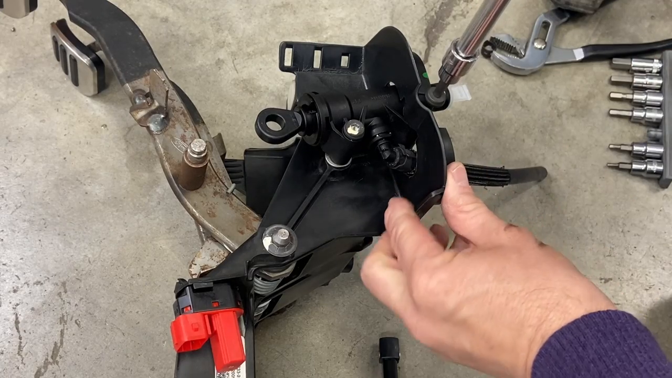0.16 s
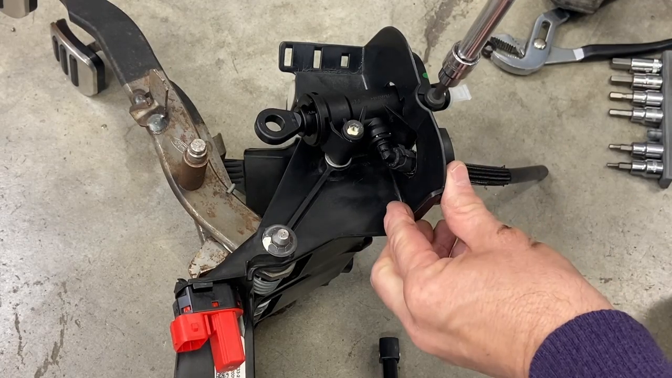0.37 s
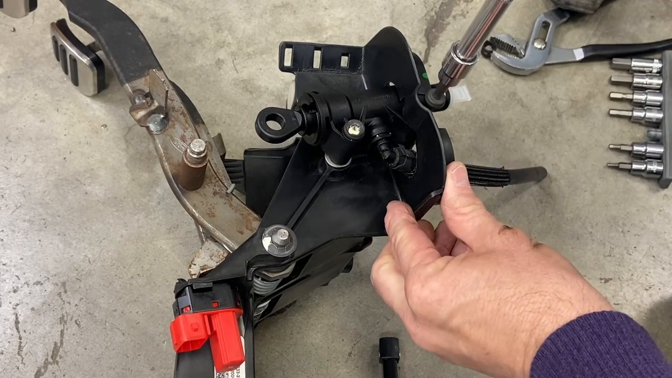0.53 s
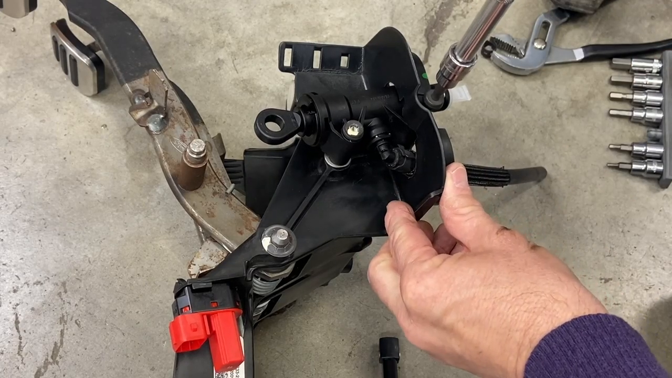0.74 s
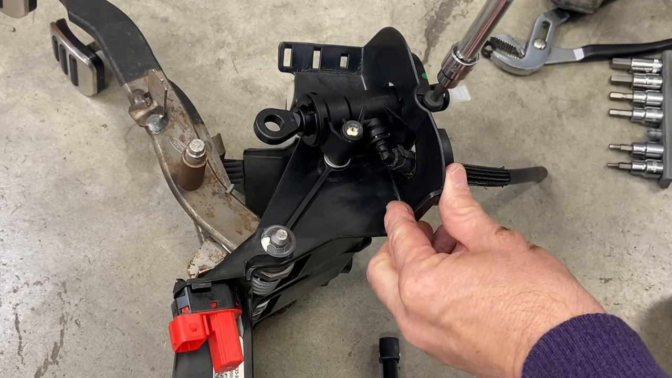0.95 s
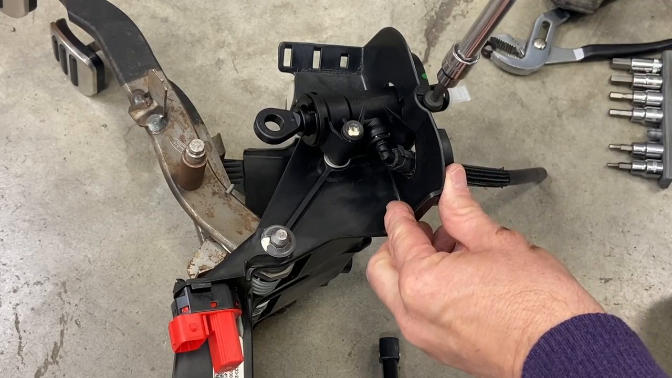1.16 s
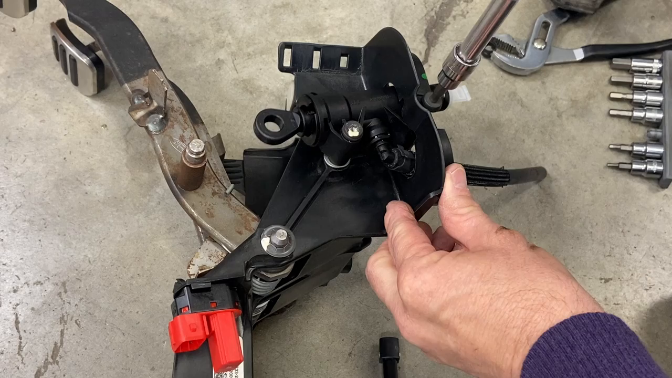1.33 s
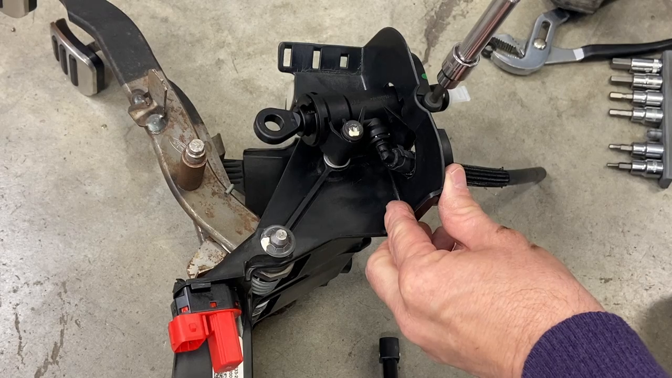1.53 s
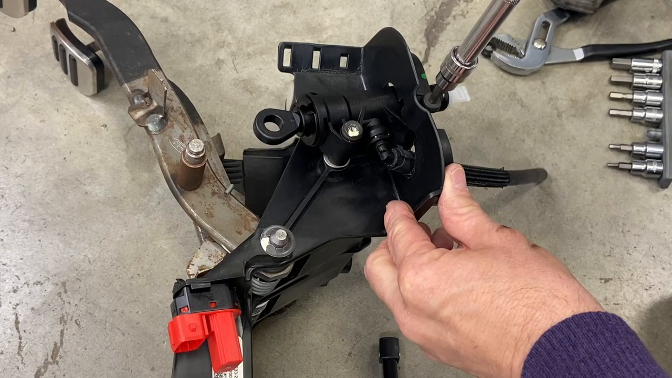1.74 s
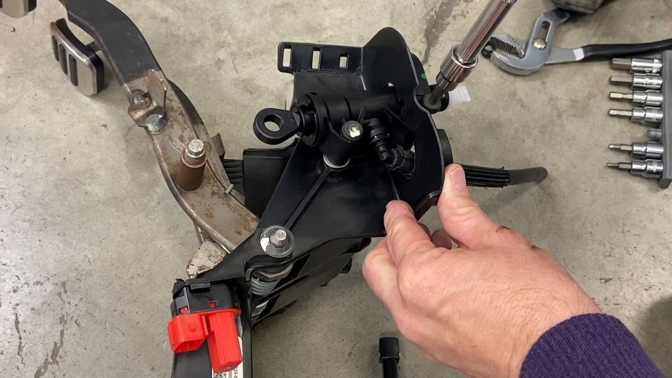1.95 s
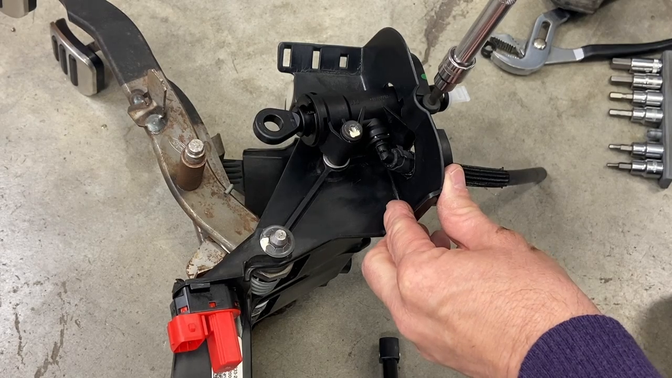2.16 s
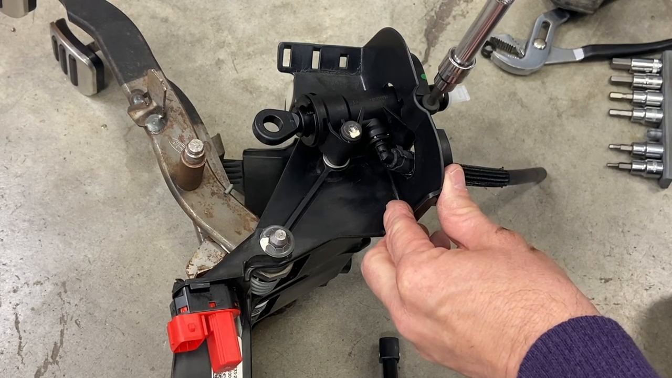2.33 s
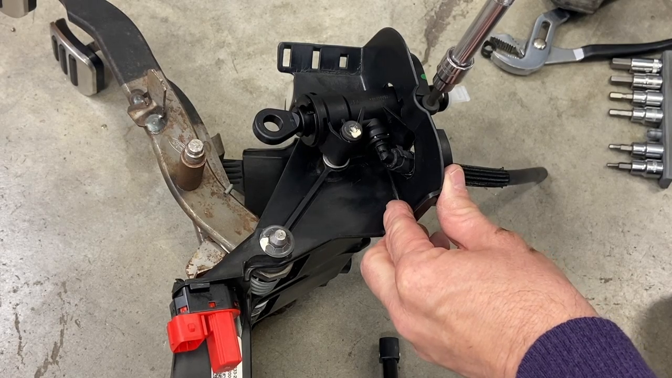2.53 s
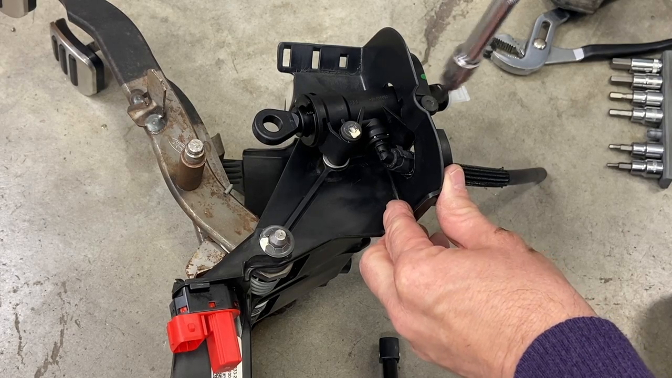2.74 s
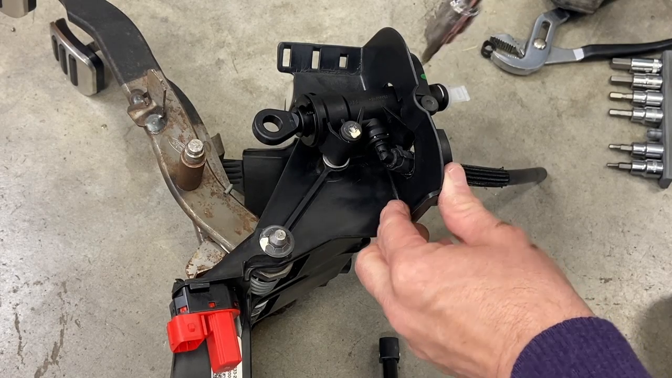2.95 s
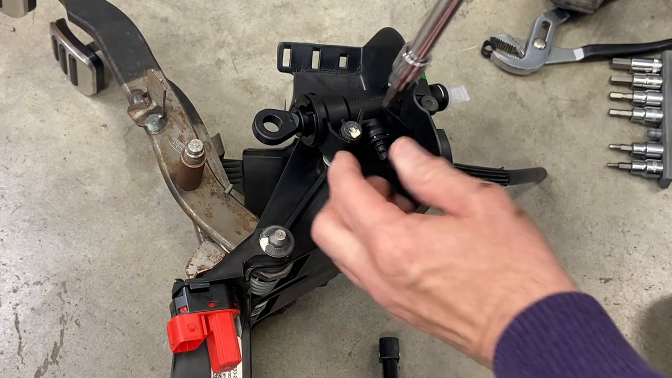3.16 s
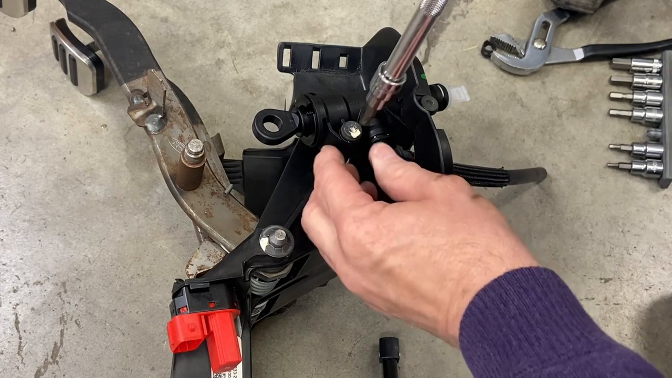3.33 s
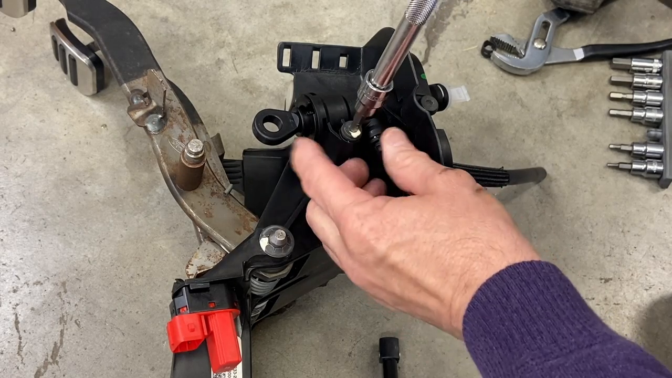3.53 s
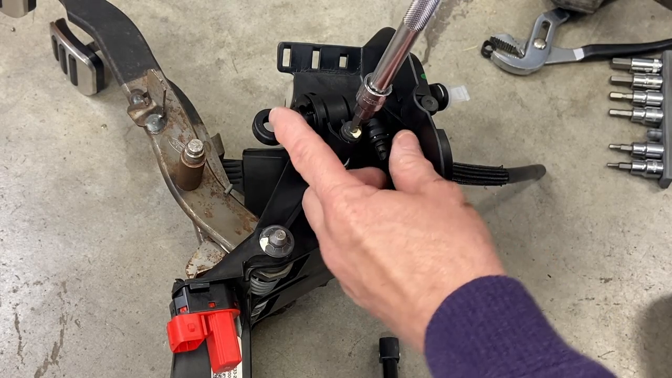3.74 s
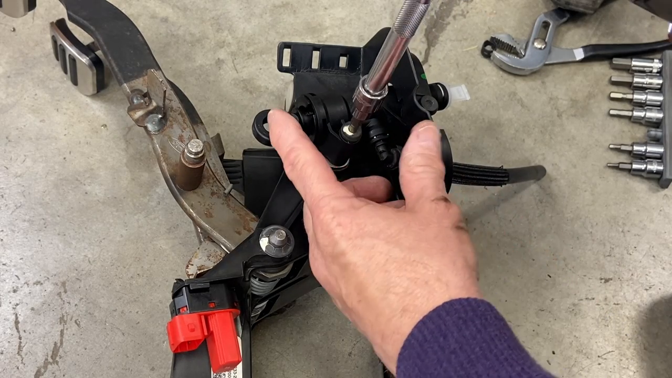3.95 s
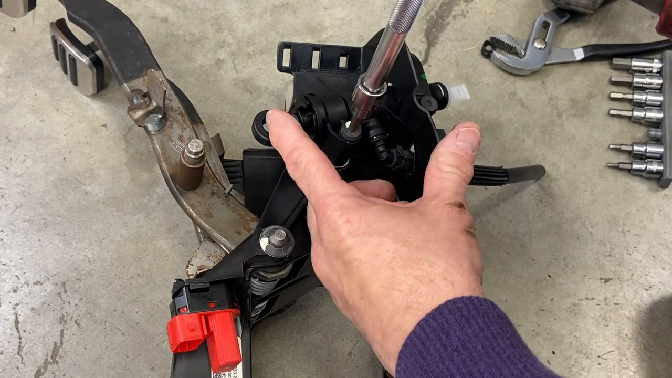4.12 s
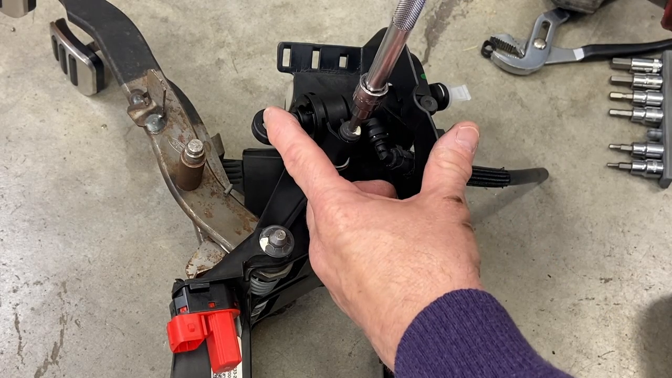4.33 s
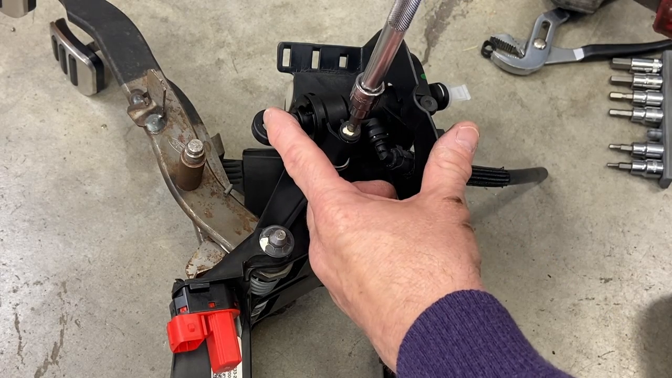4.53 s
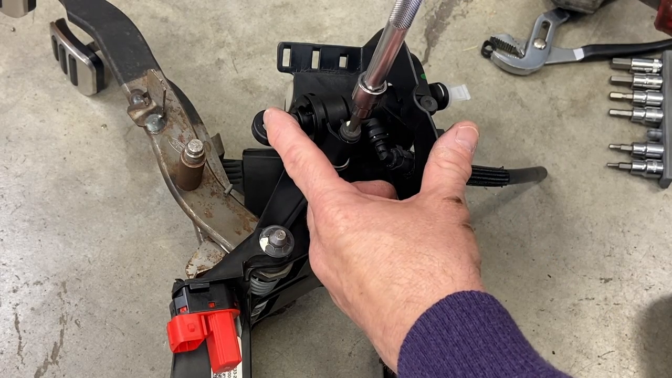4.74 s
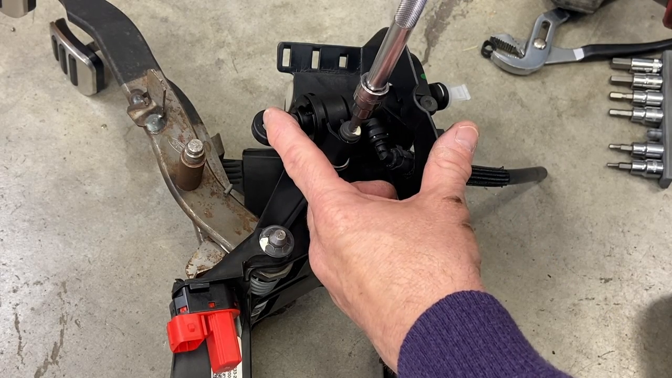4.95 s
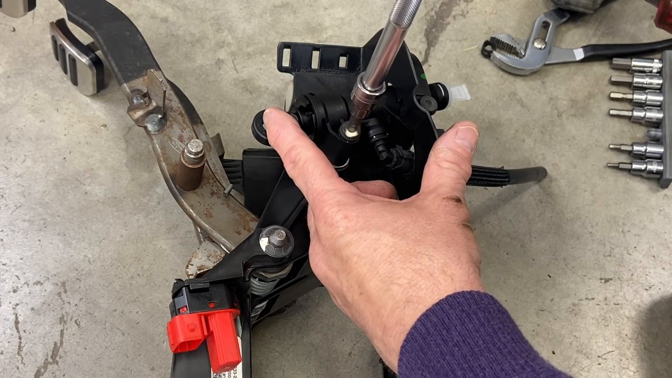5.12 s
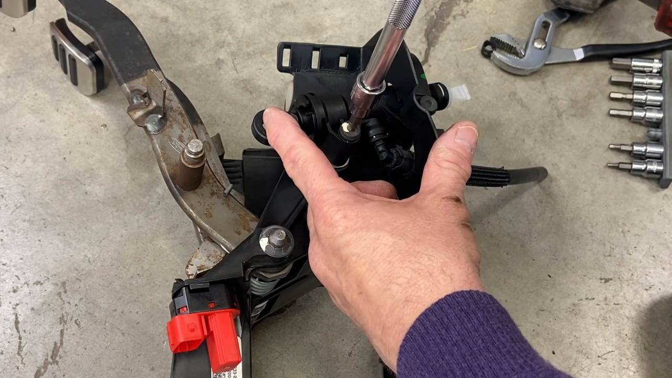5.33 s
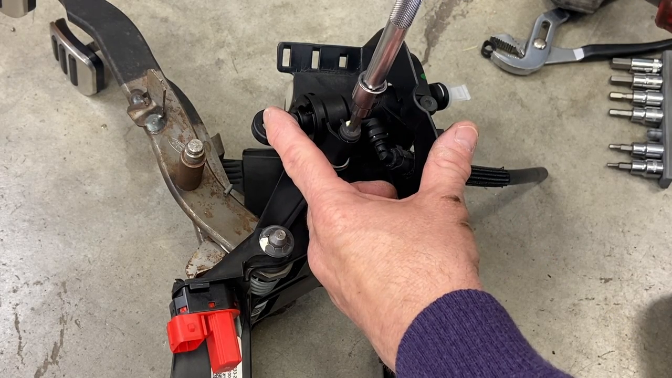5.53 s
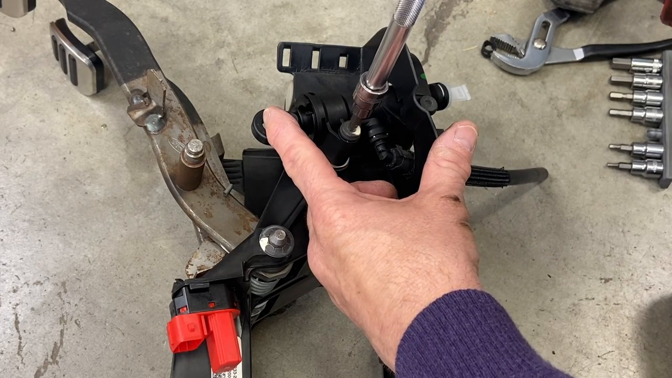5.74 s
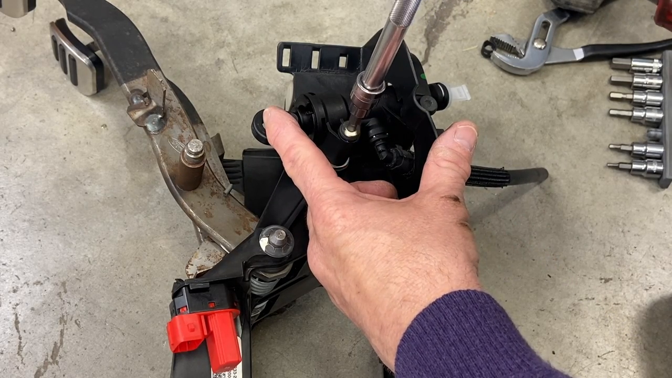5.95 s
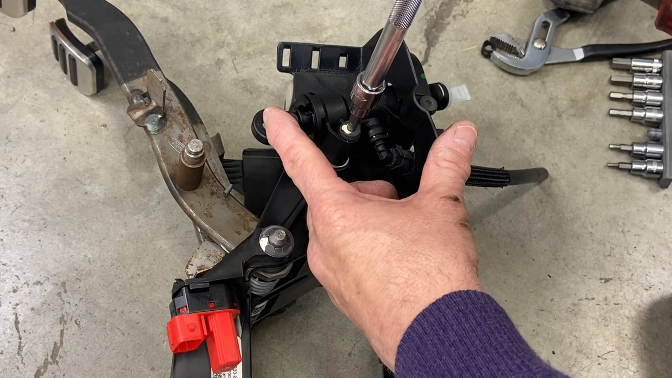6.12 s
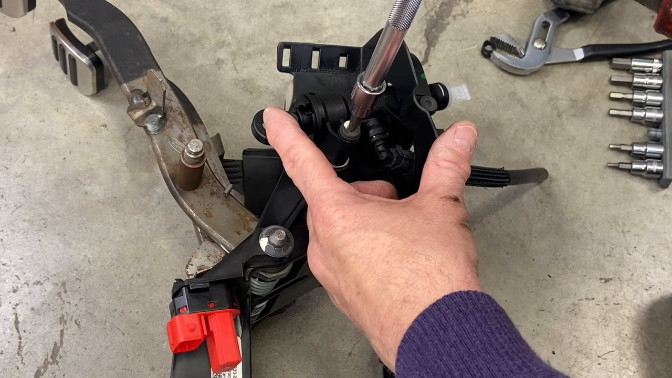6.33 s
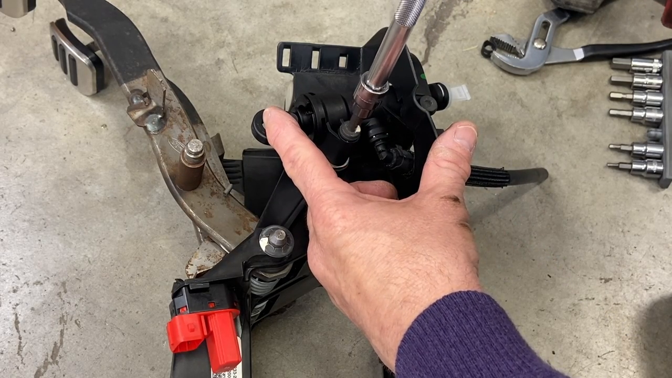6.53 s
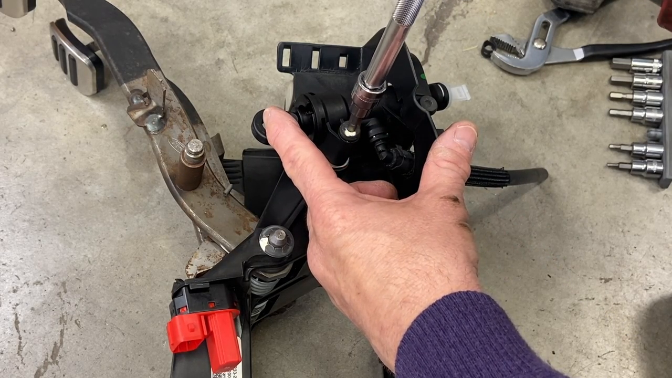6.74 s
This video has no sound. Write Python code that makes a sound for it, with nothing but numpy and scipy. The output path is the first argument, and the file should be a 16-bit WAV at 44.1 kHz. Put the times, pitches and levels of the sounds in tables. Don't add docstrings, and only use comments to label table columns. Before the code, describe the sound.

A cordless ratchet rattles loudly and fast for almost three seconds, stops, socket taps follow, then it runs again slower and quieter with distinct metallic knocks.

```python
import sys
import numpy as np
from scipy import signal
from scipy.fft import rfft, irfft, next_fast_len
from scipy.io import wavfile

SR = 44100
rng = np.random.default_rng(int(sys.argv[2]) if len(sys.argv) > 2 else 0)


def voltage_ratio(decibels):
    exponent = np.asarray(decibels, float) / 20
    return 10 ** exponent


def master_out(mix):
    frames = np.transpose(np.atleast_2d(mix))
    ceiling = np.clip(frames, -1, 1)
    pcm = np.round(ceiling * 32767).astype(np.int16)
    wavfile.write(sys.argv[1], SR, pcm)


N = 298998

# start_s, level_db
FAST_EFFORT = [(0, -20), (.1, -24.5), (.35, -25), (1.0, -26.5), (2.0, -26.5), (2.6, -25.5), (2.75, -27.5),
               (2.788, -28.5), (2.8, -40.5)]
# start_s, level_db
SLOW_EFFORT = [(3.749, -62), (3.758, -41), (3.799, -34), (4.0, -37), (4.2, -33.5), (5.0, -36), (6.2, -37),
               (6.45, -34.5), (6.78, -32.5)]
# start_s, shaft_hz
SLOW_SHAFT = [(3.75, 104.05), (3.84, 274.28), (3.97, 200.28), (4.1, 249.23), (4.25, 262.64), (4.31, 259.48),
              (4.56, 241.33), (4.63, 240.08), (4.82, 214.68), (5.03, 209.26), (5.42, 185.17),
              (5.73, 191.46), (5.84, 184.56), (6.04, 157.33), (6.16, 150.71), (6.49, 214.46),
              (6.55, 237.57), (6.79, 235.45)]
# freq_hz, density_db_per_hz
FAST_HASH = [(40, -29), (62, -9), (110, -20), (250, -18), (450, -11), (1000, -7.5), (2000, -5.5),
             (3300, -2), (5000, -1), (7500, 1.5), (9300, 2.5), (10600, -2), (11800, 0), (15500, -7)]
SHAFT_PER_STROKE = 7.141


def evened(x):
    return x / np.sqrt(np.mean(x ** 2) + 1e-20)


def read(points, hz):
    f, value = np.transpose(points)
    return np.interp(np.log(hz + 1), np.log(f + 1), value)


def curve(rows, column, off=-120):
    rows = np.array(rows)
    return np.interp(np.arange(N) / SR, rows[:, 0], rows[:, column], left=off, right=off)


def add(mix, start_s, sound):
    part = mix[max(round(start_s * SR), 0):][:len(sound)]
    part += sound[:len(part)]


def colour(x, points):
    log_gain = np.log(voltage_ratio(read(points, abs(np.fft.fftfreq(8192, 1 / SR)))))
    taps = np.fft.ifft(np.exp(log_gain - 1j * signal.hilbert(log_gain).imag)).real[:4096]
    return signal.oaconvolve(x, taps)[:len(x)]


def ring(x, hz, width_hz):
    return signal.lfilter(*signal.iirpeak(hz, hz / width_hz, SR), x)


def wobble(rate_hz, count=24):
    t, phases = np.arange(N) / SR, rng.random(count)
    rates = np.geomspace(rate_hz / 8, rate_hz, count)
    return evened(sum(np.sin(2 * np.pi * (f * t + p)) for f, p in zip(rates, phases)))


def still_air():
    # freq_hz, density_db_per_hz
    quiet = [(30, -14), (62, 0), (90, -1), (130, -10), (250, -16), (1000, -30), (2000, -35), (9000, -55),
             (15500, -60)]
    quiet_db = -84
    noise = np.array([evened(colour(v, quiet)) for v in rng.standard_normal((2, N))])
    return noise * voltage_ratio([[quiet_db], [quiet_db - 12]])


def garage(x):
    # freq_hz, t60_s
    decay = [(100, .4), (300, .7), (800, .52), (1800, .57), (4600, .58), (8000, .51), (13000, .34)]
    echoes = np.zeros((4, SR))
    at = np.arange(200, SR - 20, 20) + rng.integers(0, 20, (len(echoes), (SR - 201) // 20))
    np.put_along_axis(echoes, at, rng.choice([-1., 1.], at.shape), 1)
    hz, t, z = signal.stft(echoes, SR, nperseg=256)
    tail = signal.istft(z * voltage_ratio(-60 * t / read(decay, hz)[:, None]), SR, nperseg=256)[1]
    sway = 2 * np.pi * 2 * np.arange(N) / SR
    fed = x * np.array([np.cos(sway), np.cos(sway), np.sin(sway), np.sin(sway)])
    wet = signal.fftconvolve(fed, tail / np.linalg.norm(tail[0]), axes=1)[:, :N]
    return wet[:2] + wet[2:]


def socket():
    # start_s, peak_db, centre_hz, thump_db, t60_s
    hits = [(3.119, -63.5, 2900, -21, 0.024), (3.136, -66, 2600, -21, 0.026),
            (3.160, -58.5, 1500, -25, 0.05), (3.179, -59, 6300, -25, .03), (3.480, -40, 3480, -10, 0.013),
            (3.490, -51, 6000, -9, 0.015), (3.529, -50, 6000, -7, 0.016), (3.537, -46.5, 6000, -7, 0.0147),
            (3.547, -40.5, 5030, -13, 0.023), (3.558, -40, 3480, -34, 0.014),
            (3.558, -31.5, 2960, -36, 0.044), (3.691, -47.5, 2980, -18, 0.03),
            (3.701, -32.5, 1520, -9, 0.03), (3.712, -43.5, 1200, -6, 0.046)]
    # freq_hz, width_hz, level_db
    modes = [(1200, 200, -5), (2230, 140, -4), (3040, 200, -7), (3420, 200, -7), (4300, 250, -8)]
    # start_s, level_db
    scrape = [(3.48, -50), (3.51, -58.5), (3.545, -61), (3.58, -64), (3.685, -80), (3.695, -51),
              (3.73, -54.5), (3.76, -73)]
    out, t = np.zeros(N), np.arange(3000) / SR
    plastic = np.sin(2 * np.pi * 520 * t)
    plastic += 0.72 * np.sin(2 * np.pi * 330 * t) + 0.23 * np.sin(2 * np.pi * 660 * t)
    for start_s, peak_db, hz, thump_db, t60_s in hits:
        spectrum = [(300, -12), (hz, 0), (9000, -12), (12500, -18), (14000, -28)]
        crack = evened(colour(rng.standard_normal(len(t)), spectrum))
        crack *= voltage_ratio(-5 - 60 * t / max(t60_s, .005))
        thump = plastic * voltage_ratio(thump_db - 60 * t / 0.086)
        add(out, start_s, voltage_ratio(peak_db) * (crack + thump))
    out += sum(voltage_ratio(db + 5.0) * ring(out, hz, width_hz) for hz, width_hz, db in modes)
    slide = colour(rng.standard_normal(N),
                   [(100, 0.0), (400, -1), (2000, -1), (6000, -16.0), (12000, -30.5), (13500, -46)])
    return out + voltage_ratio(curve(scrape, 1) + 1.5 * wobble(98)) * evened(slide)


def effort_db():
    t = np.arange(N) / SR
    turn_s, bind_s, bind_db = 0.346, 0.15, 1
    bind = bind_db * np.cos(2 * np.pi * (t - bind_s) / turn_s)
    return np.maximum(curve(FAST_EFFORT, 1) + bind, curve(SLOW_EFFORT, 1))


def body_db():
    return np.where(np.arange(N) < 3.2 * SR, -10, -8)


def fast_turns():
    # start_s, strokes_done
    beat = [(.0149, 0), (.6027, 36), (1.3873, 84), (2.7641, 168)]
    s, done = np.transpose(beat)
    return np.interp(np.arange(N) / SR, np.r_[s[0] - .2, s, s[-1] + .2], np.r_[-12.2, done, 180.2])


def slow_turns():
    stroke_left = .49
    return np.cumsum(curve(SLOW_SHAFT, 1, off=0)) / SR / SHAFT_PER_STROKE - stroke_left


def motor():
    # shaft_multiple, level_db
    fast_orders = [(1, -33), (3, -31)]
    # shaft_multiple, level_db
    slow_orders = [(1, -30), (4, -23.5)]
    # shaft_multiple, level_db
    whine_orders = [(16, -11), (20, -3), (24, -12)]
    # start_s, length_s, pitch_hz, level_db
    squeal = (3.754, .06, 4170, -40.5)
    case_hz, case_width_hz = 4090, 540
    flicker_db = 1.5
    t, fast_db, slow_db = np.arange(N) / SR, curve(FAST_EFFORT, 1), curve(SLOW_EFFORT, 1)

    shaft = 2 * np.pi * SHAFT_PER_STROKE * fast_turns() + .1 * wobble(30)
    fourth_db = -20 - 40 * np.maximum(t - 2.6, 0) + flicker_db * wobble(6)
    eighth_db = -12.5 - 5 * np.maximum(t - .9, 0) + flicker_db * wobble(6)
    lines = fast_orders + [(4, fourth_db), (8, eighth_db)]
    out = sum(voltage_ratio(fast_db + db + 2.5 * wobble(90)) * np.sin(k * shaft) for k, db in lines)

    shaft = 2 * np.pi * SHAFT_PER_STROKE * slow_turns()
    out += sum(voltage_ratio(slow_db + db + 3 * wobble(15)) * np.sin(k * shaft) for k, db in slow_orders)
    for k, db in whine_orders:
        near = 1 / (1 + (2 * (k * curve(SLOW_SHAFT, 1, off=0) - case_hz) / case_width_hz) ** 2)
        out += near ** 2 * voltage_ratio(slow_db + db + 0.8 * wobble(50)) * np.sin(k * shaft + .3 * wobble(60))

    start_s, length_s, hz, db = squeal
    t = np.arange(0, length_s, 1 / SR)
    sing = evened(ring(rng.standard_normal(len(t)), hz, 150))
    add(out, start_s, voltage_ratio(db) * np.sin(np.pi * np.sqrt(t / length_s)) * sing)
    t = np.arange(4000) / SR
    add(out, 2.785, voltage_ratio(-53.5) * np.sin(2 * np.pi * 65 * t) * np.sin(np.pi * t / t[-1]) ** 2)
    return out


def thuds():
    # freq_hz, level_db
    frame = [(26, -53), (50, -9), (181, -13.5), (341, -8), (700, 2.5), (1300, -10), (1690, -35.5),
             (2860, -120)]
    train, t = np.zeros(N), np.arange(500) / SR
    fast_strokes = np.diff(np.floor(fast_turns() - .5 + .006 * wobble(60, count=6)))
    train[1:] = fast_strokes * (np.arange(1, N) < 2.79 * SR)
    train[1:] += 0.16 * np.diff(np.floor(slow_turns()))
    train *= voltage_ratio(3 * rng.standard_normal(N) + wobble(10))
    shape = rng.standard_normal(len(t)) * voltage_ratio(-60 * t / 0.025)
    jolt = colour(signal.oaconvolve(train, shape)[:N], frame)
    return voltage_ratio(effort_db() + body_db() - 12.0) * evened(jolt)


def gears():
    # freq_hz, density_db_per_hz
    slow_hash = [(40, -42), (62, -16.5), (110, -22.5), (250, -18.5), (450, -14.5), (1000, -14.5),
                 (2000, -8.5), (3300, -4.5), (5000, -6.5), (7500, -8), (9300, -10.5), (10600, -6),
                 (11800, -12.5), (15500, -16)]
    slack_db, slack_at = 2.5, .8
    contacts_per_s = 9000
    size = voltage_ratio(2.03 * np.minimum(rng.exponential(1, N), 5)) * (rng.random(N) < contacts_per_s / SR)
    teeth = size * rng.standard_normal(N) * voltage_ratio(0.5 * wobble(90))
    teeth *= voltage_ratio(-slack_db * np.cos(2 * np.pi * (slow_turns() - slack_at)))
    fast = evened(colour(teeth, FAST_HASH))
    slow = voltage_ratio(-1.0) * evened(colour(teeth, slow_hash))
    mesh = np.where(np.arange(N) > 3.2 * SR, slow, fast)
    low = signal.sosfilt(signal.butter(2, 1400, fs=SR, output="sos"), mesh)
    return voltage_ratio(effort_db() + 2.0) * (mesh - low + voltage_ratio(body_db() + 10) * low)


def blows():
    # stroke_share, level_db, spread_db
    fast_parts = [(.51, -6, -2), (.64, -6, 5), (.7, -12, -6.5), (.9, -1.5, -1), (1.171, -10, 4.5)]
    # stroke_share, level_db, spread_db, slip_share
    slow_parts = [(0, -2, 1.2, .008), (.17, -2, 2, .03), (.29, -5.5, 2.5, .05), (.42, -11, 4, .04),
                  (.718, -21, 6, .035), (.85, -16, 5, .035)]
    # start_s, extra_db
    hard = [(3.90, 4), (3.929, 5), (4.176, 5), (4.341, 8), (4.541, 5), (4.753, 5), (4.985, 8), (5.02, 6),
            (5.23, 2), (5.27, 6), (5.495, 6), (5.684, 3), (5.721, 5), (5.759, 5), (5.797, 8), (6.043, 2),
            (6.089, 2), (6.136, 0), (6.182, 5), (6.311, 4), (6.35, 5), (6.457, 4)]
    knock_base_db, follow = -26, 0.51
    t, effort, rows = np.arange(N) / SR, effort_db(), []
    start = np.interp(np.arange(-2, 169), fast_turns(), t)
    for share, db, spread_db in fast_parts:
        slip, size = rng.standard_normal((len(start), 2)).T
        at = start + (share + .02 * slip) * np.gradient(start)
        rows += zip(at, np.interp(at, t, effort) + 8 + db + spread_db * size)

    start = t[1:][np.diff(np.floor(slow_turns())) > 0]
    usual_db = np.median(SLOW_EFFORT, axis=0)[1]
    knock_db = knock_base_db + follow * (np.interp(start, t, effort) - usual_db)
    for s, extra_db in hard:
        rows.append((s, knock_db[abs(start - s).argmin()] + extra_db - 5.5))
    for share, db, spread_db, play in slow_parts:
        slip, size = rng.standard_normal((len(start), 2)).T
        at = start + (share + play * slip) * np.gradient(start)
        rows += zip(at, knock_db + db + spread_db * size)
    return [row for row in rows if .004 <= row[0] < 2.785 or row[0] > 3]


def knocks():
    # freq_hz, width_hz, level_db
    steel_modes = [(2440, 430, -17), (3000, 730, -13.5), (3900, 190, -36), (5210, 250, -5.5),
                   (6710, 640, -9), (7370, 490, -10), (9240, 667, 10.5), (10200, 210, -2),
                   (13400, 1400, -12.5)]
    fast_change_db = [0, 0, 0, 0, 0, 0, -7, 0, -2]
    drive, t = np.zeros((5, N)), np.arange(700) / SR
    for s, db in blows():
        place = drive[rng.integers(len(drive))]
        envelope = voltage_ratio(db - 60 * t / .021) * np.minimum(t / .0006, 1)
        add(place, s, envelope * rng.standard_normal(len(t)))
    place_db = 1.9 * rng.standard_normal((len(steel_modes), len(drive)))
    in_fast_run = np.arange(N) < 3 * SR
    steel = np.zeros(N)
    for (hz, width_hz, db), gain_db, less_db in zip(steel_modes, place_db, fast_change_db):
        steel += voltage_ratio(db + 10.0 + less_db * in_fast_run) * ring(voltage_ratio(gain_db) @ drive, hz, width_hz)
    return steel + voltage_ratio(-7) * colour(drive.sum(0), FAST_HASH)


def scene():
    near = knocks() + gears() + thuds() + motor() + socket()
    common, apart = voltage_ratio(-15.5) * garage(near)
    return np.array([near + common, apart]) + still_air()


def roll_off(x):
    return signal.sosfilt(signal.butter(12, 17070, fs=SR, output="sos"), x)


def record(dry):
    # freq_hz, lag_half_turns
    left_lag = [(0, 0), (7400, 0), (7700, .3), (8850, .97), (9120, 1.03), (10900, 1.97), (11500, 2.05),
                (11750, 2.3), (13000, 2.97), (13500, 3.03), (14500, 3.7), (15200, 4)]
    # freq_hz, level_db
    unlike = [(100, 11), (250, 7), (700, 4), (1400, 12), (1900, 5), (2400, -5), (6800, -14), (7800, 4),
              (15000, 8)]
    # freq_hz, level_db
    balance = [(60, 0), (140, -1), (330, -4), (500, -2), (770, 1.5), (1800, 1), (2500, 0), (15000, 0)]
    edge_hz = 15800
    size = next_fast_len(N + 4096)
    hz, (common, apart) = np.fft.rfftfreq(size, 1 / SR), rfft(dry, size)
    lag = np.pi * np.interp(hz, *np.transpose(left_lag))
    apart = apart * voltage_ratio(read(unlike, hz)) * np.where(lag > 0, np.sin(lag), 1)
    turn = np.exp(-.5j * lag) * voltage_ratio(read(balance, hz) / 2)
    channels = np.array([common * turn + apart, common / turn - apart])
    band = 1 / (1 + (hz / edge_hz) ** 300)
    return roll_off(irfft(channels * band, size)[:, :N])


dry = scene()
out = record(dry)
master_out(out)
```